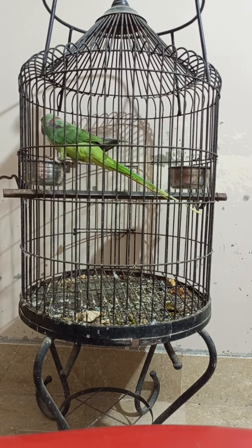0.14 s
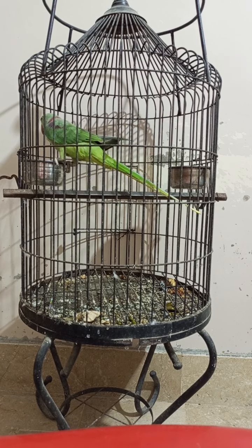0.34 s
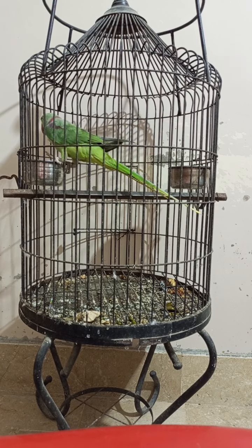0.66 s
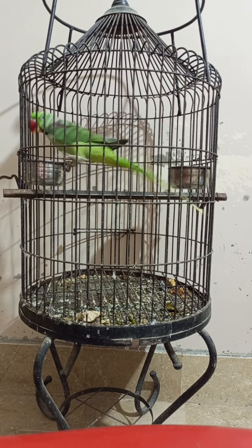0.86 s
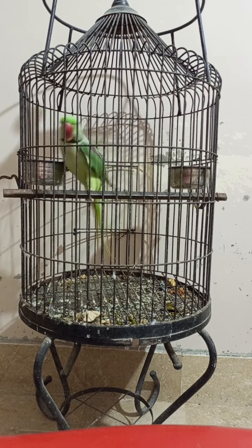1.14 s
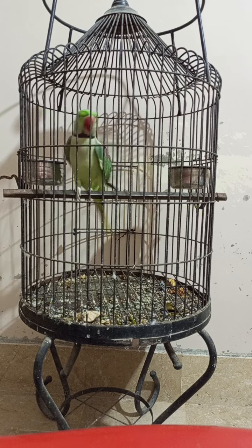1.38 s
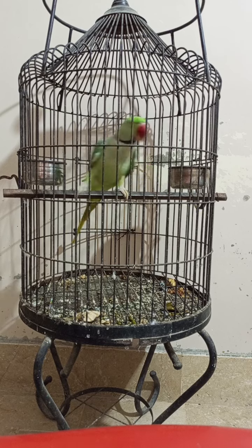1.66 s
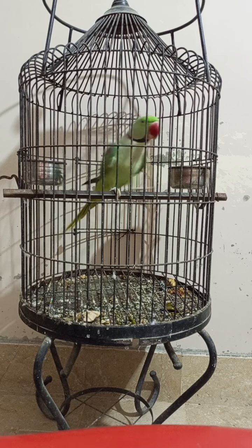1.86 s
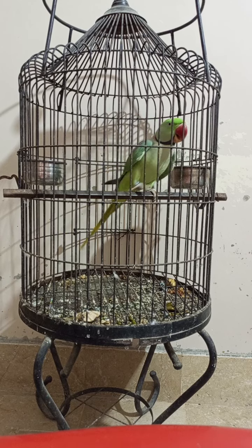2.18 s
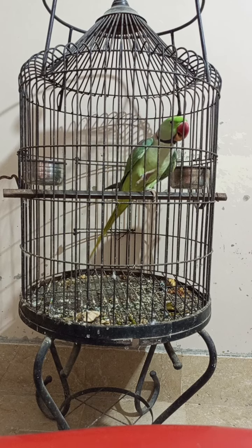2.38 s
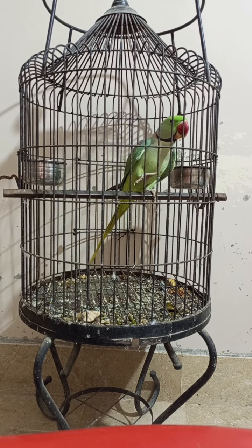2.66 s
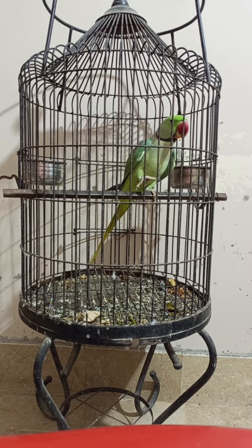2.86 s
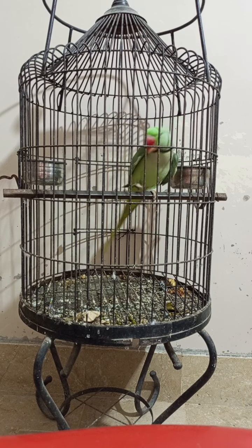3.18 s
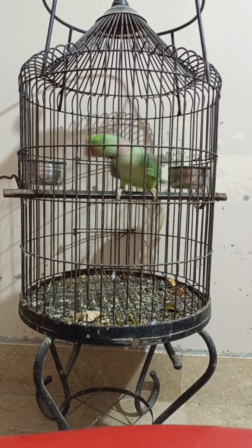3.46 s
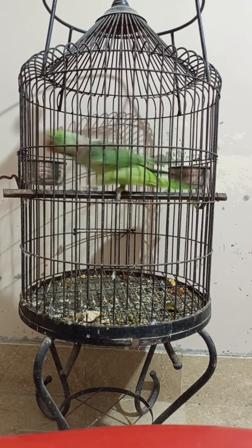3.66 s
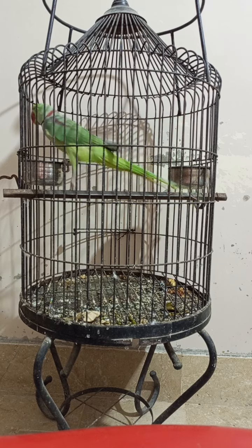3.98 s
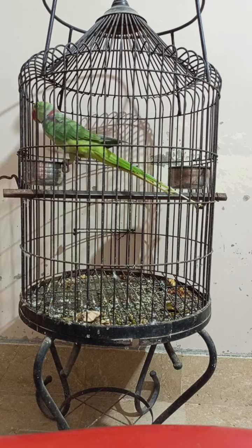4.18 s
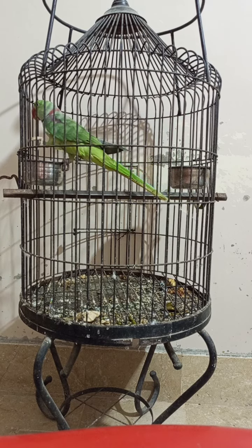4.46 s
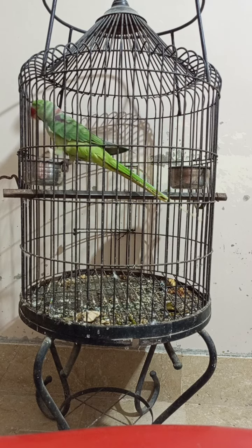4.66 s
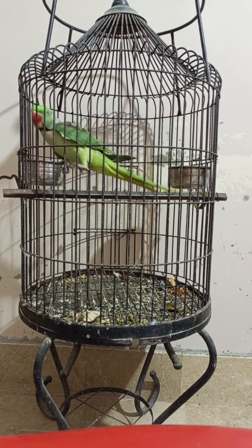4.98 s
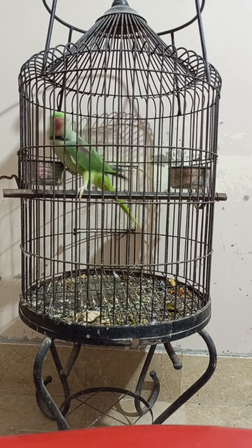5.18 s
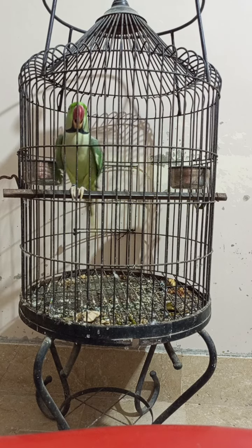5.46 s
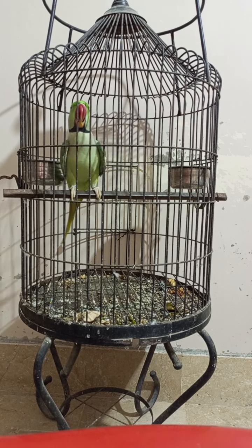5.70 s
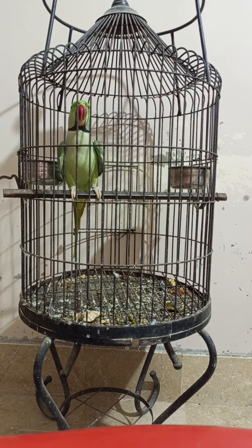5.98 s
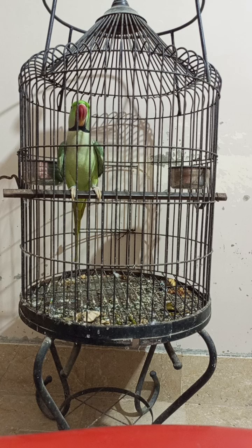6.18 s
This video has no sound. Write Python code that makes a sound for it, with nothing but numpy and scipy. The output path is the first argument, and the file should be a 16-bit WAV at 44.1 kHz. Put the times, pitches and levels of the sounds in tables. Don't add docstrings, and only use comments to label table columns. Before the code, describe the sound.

Indoors, a caged parakeet hops with a woody clatter and lets out short, piercing, rapidly warbled screeches, with faint wire rattles and distant whistles between.

```python
import sys
import numpy as np
from scipy import signal
from scipy.io import wavfile
from scipy.ndimage import uniform_filter1d, minimum_filter1d

SR = 44100
rng = np.random.default_rng(int(sys.argv[2]) if len(sys.argv) > 2 else 0)


def level_to_linear(level):
    exponent = np.asarray(level, float) / 20
    return 10 ** exponent


def materialize(psi):
    bounded = np.clip(np.atleast_2d(psi).T, -1, 1)
    quanta = np.round(bounded * 32767).astype(np.int16)
    wavfile.write(sys.argv[1], SR, quanta)


N = 279153
LEAD = int(.7 * SR)
TIME = (np.arange(N + LEAD) - LEAD) / SR


def rms_one(x):
    return x / np.sqrt(np.mean(x ** 2) + 1e-20)


def at_hz(points, hz):
    points = np.array(points)
    return np.interp(np.log(hz), np.log(points[:, 0]), points[:, 1])


def drift(rate_hz, size):
    r = np.exp(-2 * np.pi * rate_hz / SR)
    slow = signal.lfilter([1], [1, -2 * r, r * r], rng.standard_normal(size + SR))[SR:]
    return rms_one(slow)


def smooth_step(t, at, width):
    return .5 + .5 * np.tanh((t - at) / max(width, .002))


def background():
    # (frequency [Hz], density [dB per Hz])
    hiss = [(18, -52), (30, -17), (86, -3.5), (301, 2.5), (423, -3.5), (535, -13.5), (714, -7), (793, -8),
            (1690, -20.5), (3090, -26.5), (4350, -32), (6600, -39), (8370, -49.5), (13400, -47),
            (15700, -34)]
    # (frequency [Hz], level [dB rms])
    hum_lines = [(50, -91), (99, -76)]
    hiss_db = -62
    edges, out = 25 * 2 ** np.arange(0, 9.5, 1 / 3), 0
    white = rng.standard_normal((2, len(TIME)))
    for k, (low, high) in enumerate(zip(edges, edges[1:])):
        band = signal.sosfilt(signal.butter(2, [low, high], "band", fs=SR, output="sos"), white[k % 2])
        flicker = np.repeat(drift(400, size=len(TIME) // 50 + 1), 50)[:len(TIME)]
        out = out + band * level_to_linear(at_hz(hiss, np.sqrt(low * high)) + 1.1 * flicker)
    hum = 0
    for hz, db in hum_lines:
        hum = hum + level_to_linear(db + 4 + 2.8 * drift(4, size=len(TIME))) * np.sin(2 * np.pi * hz * TIME)
    return level_to_linear(hiss_db) * rms_one(out) + hum


def voice(pitch_hz, rough, tilt_db, facing_db, beak_hz, beak_db):
    # (frequency [Hz], gain [dB])
    throat = [(600, -17), (900, -17.5), (1400, -11.5), (1900, -8), (2400, -1.5), (3000, -6), (3700, -8),
              (4800, -14), (7100, -14), (8400, -34.5), (11500, -36.5), (14000, -34), (15600, -25.5)]
    facing_hz = [1900, 4300, 7000, 13000]
    phase, out = 2 * np.pi * np.cumsum(pitch_hz) / SR, 0
    for k in range(1, 21):
        hz = k * pitch_hz
        facing = sum(db * np.exp(-(np.log(hz / at) / .25) ** 2) for at, db in zip(facing_hz, facing_db))
        windpipe = 5.2 * np.exp(-((hz - 1930) / 130) ** 2)
        beak = beak_db * np.exp(-((hz - beak_hz) / 330) ** 2)
        gain_db = at_hz(throat, hz) + tilt_db * np.log2(k) + facing + windpipe + beak
        gain = level_to_linear(gain_db) * (hz < 17000)
        smear = np.clip(rough, 0, .2) * (k - .6) ** .8 * drift(500, size=len(hz))
        gain = gain * (1 + smear) / np.sqrt(1 + np.mean(smear ** 2))
        out = out + gain * np.sin(k * phase)
    return rms_one(out)


def effort(t, length, level_db, sag_db):
    release = np.clip((t - length + .1) / .1, 0, 1)
    swell_db, release_db = 4.5 * np.exp(-t / .025), 21 * release ** 2
    return level_db - swell_db - sag_db * t - release_db


def screeches():
    # (start [s], length [s], level [dB], sag of effort [dB per s], crest pitch [Hz])
    calls = [
        (-.62, .42, -18.5, 0, 2100),
        (2.022, .327, -22, 14, 1900),
        (3.891, .44, -22.5, 10, 2010),
        (5.19, .37, -21.5, 12, 1965),
    ]
    # (first pitch dip [s], dips [per s], quickening [per s squared])
    warbles = [(-.614, 46.8, 0), (2.0246, 49.1, 0), (3.8925, 48.25, -9.3), (5.1894, 43.5, 16)]
    # (high dip [Hz], low dip [Hz], drop after [s], drop takes [s])
    settlings = [(1470, 1000, .2, .1), (1480, 1020, .1, .035), (1395, 910, .285, .05),
                 (1490, 975, .128, .035)]
    # (break [dB], heals after [s], roughness [0-1])
    breaks = [(10, .08, .2), (15, .045, .04), (9.5, .1, .2), (16, .11, .13)]
    facings = [(-2.5, 5, 1.1, -3), (0.5, -1.5, 2.5, -6), (-1.5, 3, 1, -5), (0, 3, 1, 2.5)]
    # (start [Hz], end [Hz], boost [dB])
    beaks = [(3030, 2500, 8), (3190, 2300, 10.5), (2800, 2500, 3.5), (3050, 2400, 4.5)]
    dip_sag, crest_sag = 350, 230
    late_break_db, end_break_db = 2.5, 7.0
    out = np.zeros(len(TIME))
    for call, warble, settling, broken, facing_db, beak in zip(calls, warbles, settlings, breaks, facings, beaks):
        start, length, top_db, sag_db, top_hz = call
        first, per_s, quicken = warble
        early_hz, low_hz, drop, takes = settling
        early_db, heal, rough = broken
        start_hz, end_hz, beak_db = beak
        span = (TIME >= start) & (TIME < start + length)
        t, since = TIME[span] - start, TIME[span] - first
        size = len(t)
        turn = 2 * np.pi * (per_s * since + quicken * since ** 2 / 2)

        high_hz = early_hz - dip_sag * t
        dip_hz = high_hz + (low_hz - high_hz) * smooth_step(t, drop, takes)
        crest_hz = top_hz - crest_sag * (t - length / 2)
        lift = .5 - .5 * np.tanh(1.3 * np.cos(turn - .35 * np.cos(turn))) / np.tanh(1.3)
        pitch_hz = (dip_hz + (crest_hz - dip_hz) * lift) * (1 + .015 * drift(60, size=size))

        level_db = effort(t, length, top_db, sag_db)
        break_db = early_db + (late_break_db - early_db) * smooth_step(t, heal, .015)
        broken_part = .5 + .5 * np.tanh(6.6 * (np.cos(turn - 3.9) + 0.21))
        gate_db = -(break_db + end_break_db * smooth_step(t, length - .1, .02)) * broken_part
        edge = np.clip(np.minimum(t / .003, (length - t) / .012), 0, 1)

        effort_db = level_db - level_db.max()
        flare_db = .4 * break_db * (np.cos(turn - .6) - .75) - 18 * smooth_step(t, length - .085, .03)
        colour_db = [*facing_db[:3], facing_db[3] + 1.2 * effort_db + flare_db]
        beak_hz = start_hz + (end_hz - start_hz) * np.linspace(0, 1, size) ** 2

        tone = level_to_linear(gate_db) * voice(pitch_hz, rough, -2.3, colour_db, beak_hz, beak_db)
        thin_hz = 1.93 * dip_hz * (1 + .11 * np.sin(turn - 1.2))
        thin_gain = np.clip(break_db / 12, 0, 1) * np.clip(np.cos(turn - 4.0), 0, 1) ** 2 * (turn > 2)
        thin = thin_gain * level_to_linear(-5.5) * voice(thin_hz, .1, 3.0, colour_db, beak_hz, beak_db)
        unsteady_db = 1.2 * drift(30, size=size)
        out[span] += edge * level_to_linear(level_db + unsteady_db) * (tone + thin)
    return out


def swells(rows, waver):
    out = np.zeros(len(TIME))
    for s, length, start_hz, end_hz, level_db in rows:
        at, size = int(s * SR) + LEAD, int(length * SR)
        phase = 2 * np.pi * np.cumsum(np.linspace(start_hz, end_hz, size)) / SR
        shake, slip = waver * drift(35, size=size), waver * drift(35, size=size)
        tone = rms_one((1 + shake) * np.sin(phase) + slip * np.cos(phase))
        swell = level_to_linear(level_db) * np.hanning(size) ** .5 * tone
        out[at:at + size] += swell[:len(TIME) - at]
    return out


def ringing_wires():
    # (start [s], length [s], start pitch [Hz], end pitch [Hz], level [dB])
    rings = [(1.29, .14, 1290, 1290, -63), (1.3, 0.12, 675, 679, -59), (1.99, 0.053, 824, 830, -58),
             (3.885, 0.13, 840, 837, -53), (3.875, .06, 690, 680, -55), (5.18, 0.073, 825, 820, -59),
             (4.5, 0.067, 2603, 2612, -61.5), (4.5, .1, 3865, 3917, -69.5), (.0, 0.11, 2540, 2570, -61.5),
             (2.36, 0.27, 2400, 2350, -51), (2.7, 0.16, 2780, 2730, -65.5), (2.78, 0.17, 3700, 3720, -71.5),
             (2.72, 0.13, 6820, 6650, -78), (2.78, .07, 5550, 5480, -80), (2.82, 0.18, 4270, 4260, -78.5),
             (5.72, .2, 2670, 2643, -63), (5.76, 0.1, 1950, 1940, -89)]
    return swells(rings, waver=1.5)


def far_sounds():
    # (start [s], length [s], start pitch [Hz], end pitch [Hz], level [dB])
    distant = [(0.284, .3, 3010, 2900, -74.5), (.4, 0.12, 3470, 3460, -74.5), (.5, .12, 3680, 3840, -79),
               (1.862, 0.019, 4750, 4860, -79), (2.93, 0.07, 2270, 2290, -64), (.2, .07, 4350, 4320, -83),
               (1.633, 0.19, 3920, 3840, -80), (2.409, 0.064, 723, 724, -65),
               (3.19, 0.059, 714, 712, -61.5), (3.22, .13, 3400, 3600, -74), (3.4, .12, 2950, 2930, -78),
               (3.59, .27, 3090, 3080, -76), (4.739, 0.058, 4660, 4700, -77),
               (4.739, 0.036, 4440, 4370, -76), (4.836, 0.085, 3480, 3280, -71.5),
               (4.967, .12, 3410, 3520, -77), (5.1, 0.14, 2750, 2750, -69), (6.034, .06, 328.5, 320, -53),
               (6.072, .07, 704, 700, -59.5), (6.02, .25, 3050, 3050, -77.5), (6.03, 0.12, 4400, 4410, -82)]
    return level_to_linear(-1.5) * room(swells(distant, waver=1.2), wet_db=-10.5)


def jolt_levels(rows, slopes, after):
    s, level_db = np.transpose(rows)
    span = (TIME >= s[0] - .06) & (TIME < s[-1] + after)
    late = TIME[span] - s[:, None]
    shape_db = np.where(late < 0, slopes[0] * late, -slopes[1] * late)
    return span, np.max(level_db[:, None] + shape_db, axis=0)


def rattle(span, level_db, modes, per_s, sharp, uneven_db):
    size, out = span.sum() + SR // 4, 0
    clicks = (rng.random(size) < per_s / SR) * level_to_linear(2.1 * np.minimum(rng.exponential(1, size), 4))
    for hz, width_hz, db in modes:
        r, w = np.exp(-np.pi * width_hz / sharp / SR), 2 * np.pi * hz / SR
        uneven = level_to_linear(db + uneven_db * drift(6.2, size=size))
        push = clicks * rng.standard_normal(size) * uneven + 1e-18
        contact = signal.butter(2, [hz / 1.15, hz * 1.15], "band", fs=SR, output="sos")
        soft = signal.sosfilt(contact, push)
        out = out + signal.lfilter([(1 - r * r) / 2, 0, (r * r - 1) / 2], [1, -2 * r * np.cos(w), r * r], soft)
    out = out[SR // 4:]
    even = np.sqrt(uniform_filter1d(out ** 2, int(0.035 * SR)) + 1e-18)
    full = np.zeros(len(TIME))
    full[span] = level_to_linear(level_db) * out / even * signal.windows.tukey(len(out), .08)
    return full


def hop():
    # (time [s], perch [dB], middle wires [dB], thin wires [dB])
    jolts = np.array([
        (1.056, -27.5, -56, -52),
        (1.128, -30, -37.5, -69),
        (1.18, -30.5, -59, -80),
    ])
    # (rise [dB per s], fall [dB per s])
    jolt_slopes = [(720, 180), (800, 360), (650, 300)]
    # (frequency [Hz], width [Hz], level [dB])
    perch = [(519, 50, -11.5), (646, 31, -9.5), (784, 40, -3), (873, 140, -9), (1075, 54, -14.5),
             (1254, 67, -4), (1530, 72, -6), (1750, 37, -11), (1940, 50, -9.5), (2140, 70, -15.5),
             (2325, 37, -21.5)]
    # (frequency [Hz], width [Hz], level [dB])
    middle_wires = [(2690, 36, -11), (3030, 37, 0.5), (3260, 29, -6), (3410, 15, -1), (3600, 44, -8.5),
                    (3830, 15, -11.5), (4114, 48, -10.5), (4470, 33, -17), (4770, 14, -18), (5470, 49, -18),
                    (5440, 110, -21.5), (6300, 120, -23)]
    # (frequency [Hz], width [Hz], level [dB])
    thin_wires = [(6250, 36, -5), (7100, 94, 5), (7700, 170, 1), (8100, 45, -16), (8600, 28, -11),
                  (9300, 45, -4), (9780, 34, -11), (10500, 37, -27)]
    # (start [s], length [s], start pitch [Hz], end pitch [Hz], level [dB])
    landing = [(1.005, 0.038, 1300, 1200, -46.5), (1.018, 0.059, 906, 860, -34.5),
               (1.05, 0.049, 810, 690, -37.5), (1.05, .045, 580, 480, -45.5), (1.0, .016, 8700, 8700, -73),
               (1.2, 0.034, 5400, 5400, -74), (1.11, 0.017, 800, 780, -49), (1.155, .045, 1280, 1300, -39),
               (1.15, .06, 830, 643, -43.5), (1.25, .05, 650, 650, -42)]
    levels = [jolt_levels(jolts[:, [0, k + 1]], jolt_slopes[k], after=.18) for k in range(3)]
    (span, perch_db), (_, middle_db), (_, thin_db) = levels
    out = rattle(span, perch_db - 5.5, perch, per_s=2500, sharp=0.68, uneven_db=3.0)
    out += swells(landing, waver=0.43)
    out += rattle(span, middle_db - 2.5, middle_wires, per_s=3300, sharp=0.33, uneven_db=5.5)
    return out + rattle(span, thin_db - 2.5, thin_wires, per_s=3300, sharp=0.18, uneven_db=4.0)


def claw_ticks():
    # (start [s], length [s], level [dB])
    ticks = [
        (1.04, .04, -74),
        (1.13, .03, -72),
    ]
    out = np.zeros(len(TIME))
    for s, length, level_db in ticks:
        at, size = int(s * SR) + LEAD, int(length * SR)
        out[at:at + size] += level_to_linear(level_db) * np.hanning(size) * rng.standard_normal(size)
    return signal.sosfilt(signal.butter(4, 13000, "high", fs=SR, output="sos"), out)


def creaks():
    # (start [s], length [s], pitch [Hz], level [dB], tilt [dB per octave])
    onsets = [
        (1.966, .011, 960, -42.5, -8.5),
        (1.979, 0.013, 812, -37, -8.5),
        (2.003, 0.01, 950, -48.5, 1),
        (3.867, .014, 807, -50, -14.5),
        (3.873, .016, 827, -35.5, -5),
        (5.168, 0.01, 800, -30.5, -7.5),
    ]
    out = np.zeros(len(TIME))
    for s, length, hz, level_db, tilt_db in onsets:
        at, size = int(s * SR) + LEAD, int(length * SR)
        creak = voice(np.full(size, hz), 0.54, tilt_db, facing_db=(-0.5, -0.5, 4, -12.5), beak_hz=3100, beak_db=3.0)
        out[at:at + size] += level_to_linear(level_db) * np.hanning(size) * creak
    return out


def shuffle():
    # (time [s], level [dB])
    steps = [
        (2.62, -60),
        (2.8, -59.5),
        (3.0, -74),
    ]
    # (rise [dB per s], fall [dB per s])
    slopes = (120, 70)
    # (frequency [Hz], width [Hz], level [dB])
    wires = [(2290, 72, -1), (2730, 41, 0.5), (3250, 100, -5), (3750, 37, -11), (4260, 37, -14),
             (4470, 30, -11), (5340, 180, -19.5), (6240, 69, -29), (6340, 44, -21), (7000, 94, -19.5),
             (7530, 94, -33)]
    span, level_db = jolt_levels(steps, slopes, after=.05)
    return rattle(span, level_db - 4, wires, per_s=6000, sharp=.5, uneven_db=4.5)


def grip():
    # (time [s], level [dB])
    clenches = [
        (3.786, -66.5),
        (3.868, -72),
    ]
    # (rise [dB per s], fall [dB per s])
    slopes = (1000, 110)
    # (frequency [Hz], width [Hz], level [dB])
    wires = [(6130, 20, -1.5), (6410, 36, -4.5), (6610, 25, -5), (7070, 32, 3), (7850, 67, -14),
             (9100, 96, -2), (10300, 110, -14.5), (10900, 35, -22.5)]
    span, level_db = jolt_levels(clenches, slopes, after=.003)
    return rattle(span, level_db - 3.5, wires, per_s=1500, sharp=.8, uneven_db=2.0)


def room(x, wet_db):
    # (frequency [Hz], time to fall 60 dB [s])
    walls = [(500, 0.21), (1200, 0.5), (2500, 0.68), (5000, 0.54), (9000, .4), (15000, 0.1)]
    t, echoes = np.arange(SR) / SR, 0
    for low in 250 * 2 ** np.arange(0, 6, .5):
        octave = signal.butter(2, [low, low * np.sqrt(2)], "band", fs=SR, output="sos")
        band = signal.sosfilt(octave, rng.standard_normal(SR))
        echoes = echoes + band * level_to_linear(-60 * t / max(at_hz(walls, low * 1.4), .1))
    echoes = echoes * np.clip((t - .004) / .012, 0, 1)
    echoes = echoes / np.sqrt(np.sum(echoes ** 2))
    return x + level_to_linear(wet_db) * signal.fftconvolve(x, echoes)[:len(x)]


def suppress(x, knee_db, slope, fall_db):
    # (from [s], knee lift [dB])
    closing = [(-1, 4), (.1, 14), (.96, -11), (1.19, 1), (1.95, -5), (4.1, -1.5), (4.56, 13), (5.05, 1),
               (5.78, 9)]
    hz, s, cells = signal.stft(x, SR, nperseg=1024, noverlap=768)
    power = uniform_filter1d(np.abs(cells) ** 2, size=5, axis=1)
    since, lifts_db = np.transpose(closing)
    lift_db = uniform_filter1d(lifts_db[np.searchsorted(since, s - LEAD / SR) - 1], size=5)
    knee = knee_db + lift_db - fall_db * np.log2(np.maximum(hz, 300) / 2000)[:, None]
    gain = level_to_linear(np.clip(slope * (10 * np.log10(power + 1e-16) - knee), -25, 0))
    return signal.istft(cells * gain, SR, nperseg=1024, noverlap=768)[1][:len(x)]


def scene():
    bird = screeches() + creaks()
    bird = signal.sosfilt(signal.butter(4, 600, "high", fs=SR, output="sos"), bird)
    cage = ringing_wires() + hop() + shuffle() + grip()
    near = room(bird, wet_db=-6.0) + room(cage, wet_db=-13.5)
    heard = suppress(near, knee_db=-77, slope=0.87, fall_db=10.0) + claw_ticks() + far_sounds()
    return (heard + background())[None, LEAD:]


def roll_off(x):
    return signal.sosfilt(signal.butter(12, 16680, fs=SR, output="sos"), x)


def record(dry):
    cut = signal.sosfilt(signal.butter(2, 70, "high", fs=SR, output="sos"), dry)
    peak, hold = .25, int(.002 * SR)
    duck = minimum_filter1d(np.minimum(1, peak / np.abs(cut + 1e-12)), 2 * hold)
    cut = cut * uniform_filter1d(duck, hold)
    cut = signal.sosfilt(signal.ellip(10, .5, 70, 15780, fs=SR, output="sos"), cut)
    return roll_off(cut)


dry = scene()
out = record(dry)
materialize(out)
```